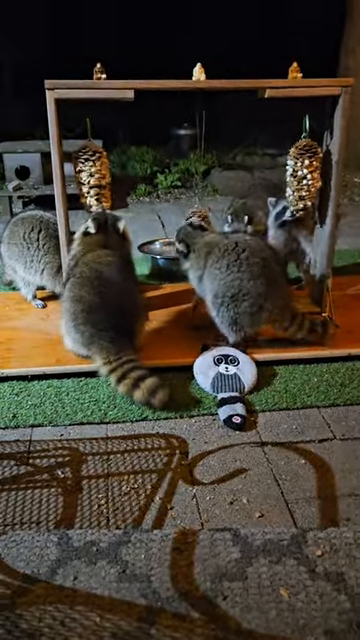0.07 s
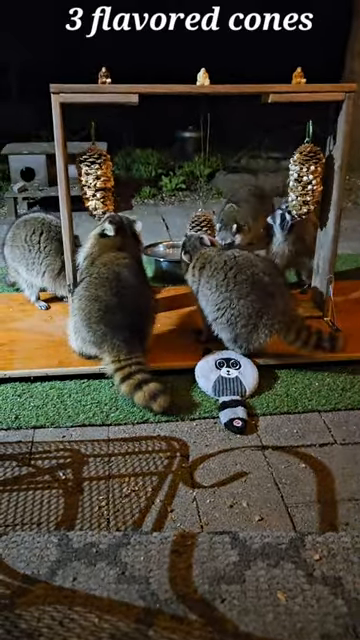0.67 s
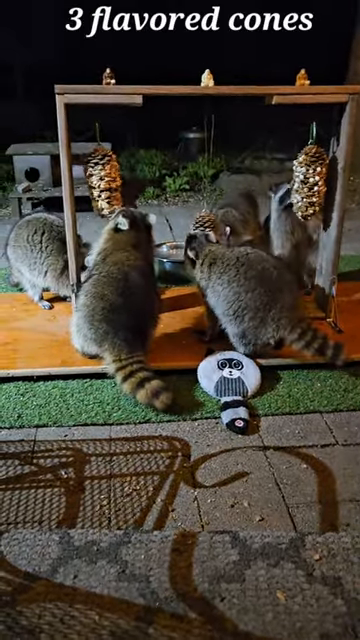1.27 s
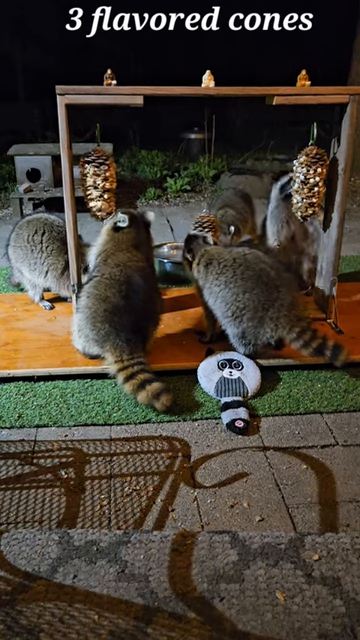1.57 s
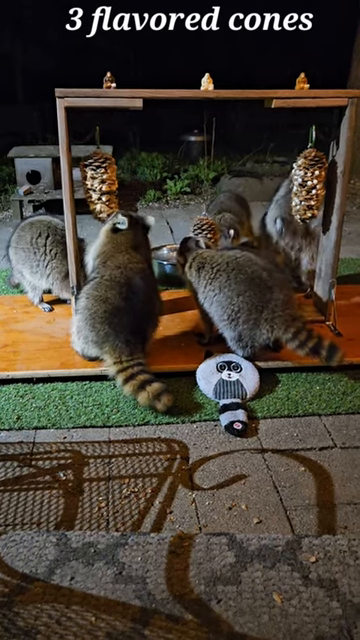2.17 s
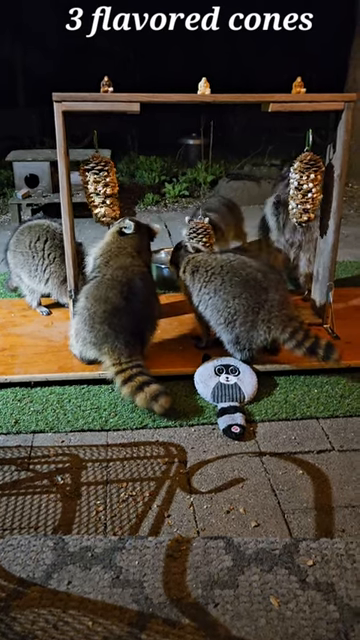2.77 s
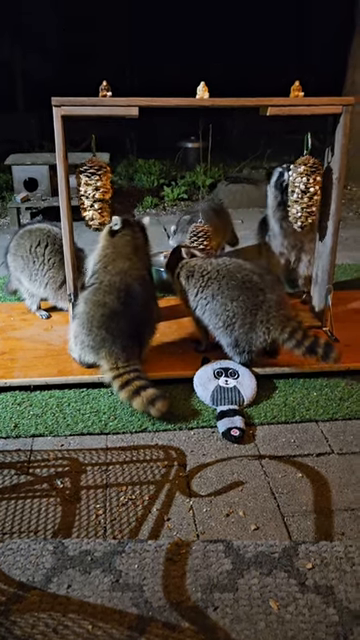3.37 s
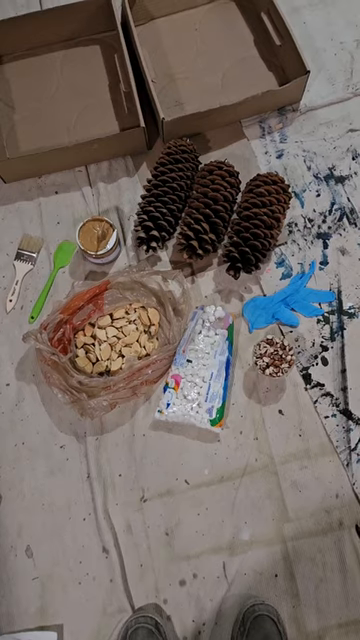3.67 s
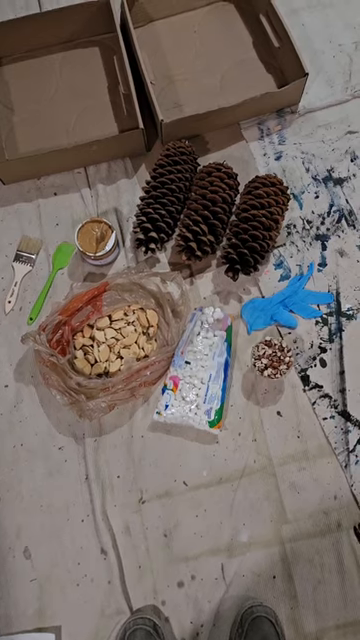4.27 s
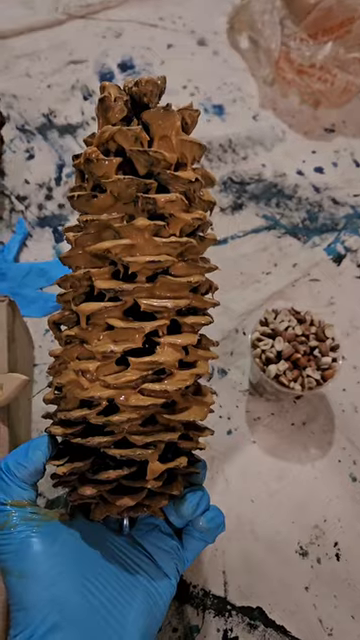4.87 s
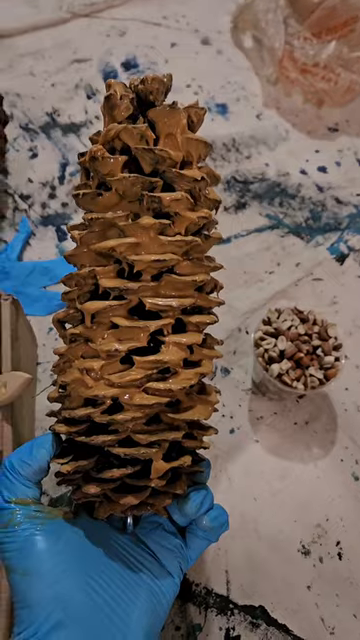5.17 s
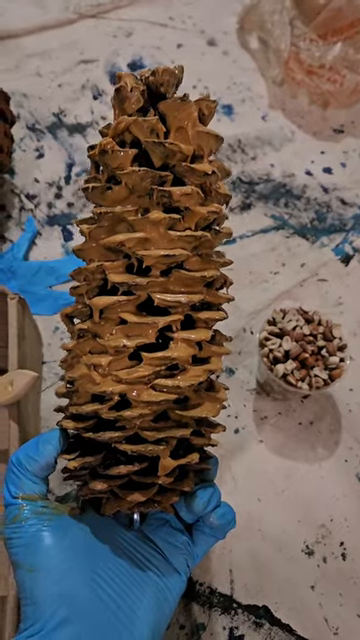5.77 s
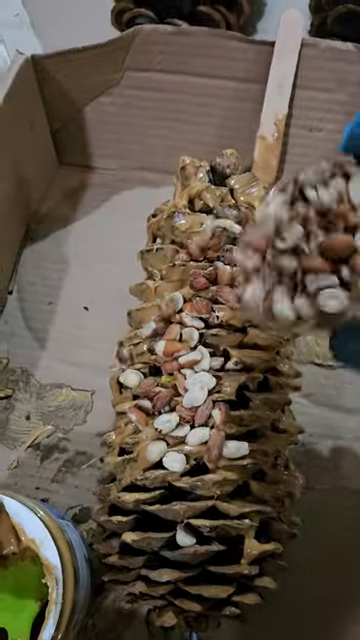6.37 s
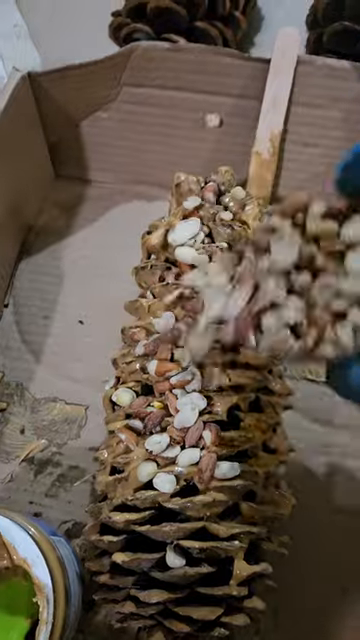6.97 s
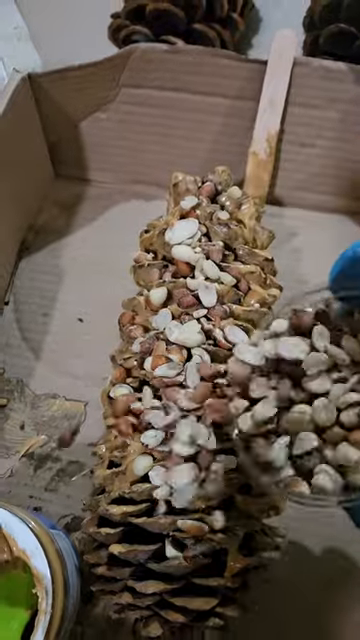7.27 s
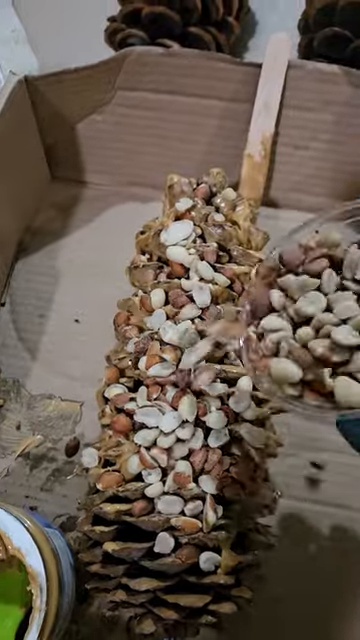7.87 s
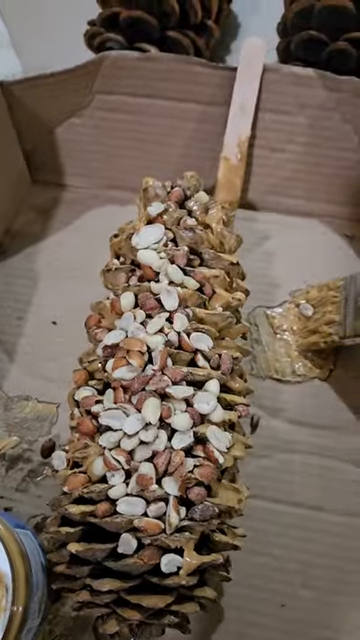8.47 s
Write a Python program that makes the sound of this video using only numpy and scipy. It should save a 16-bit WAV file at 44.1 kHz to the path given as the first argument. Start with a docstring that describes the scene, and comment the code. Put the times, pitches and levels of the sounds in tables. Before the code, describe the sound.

For the first 3.5 seconds, a quiet yard at night carries a low rumble and a distant machine hum, with a far engine swelling slightly near 1.7 seconds. Raccoons scratch and rustle faintly at feeders, with dry ticks and tiny chewing smacks. At about 3.5 seconds the sound cuts to a quiet room. Two soft, dull shuffles come at 3.6 and 3.9 seconds, followed by a few barely audible handling ticks over low room noise. From 5.8 seconds, peanuts rattle in a shaken cup close by and click irregularly onto a pine cone. Strays knock and bounce on the floor of a cardboard box, loudest around 6.8, 7.2 and 7.8 seconds, with a slightly hollow ring. Soft low handling bumps come near 6.5 and 7.6 seconds. The rattle fades out by about 8.3 seconds with one last small bump.

```python
"""A yard at night, then a quiet room. Outside, raccoons scratch, rustle and chew faintly at hanging
feeders over a distant hum. Indoors, someone shuffles twice, softly; then peanuts are shaken from a cup
onto a pine cone. They click on its scales and on each other, and strays knock and bounce on the floor
of a cardboard box. Each impact excites damped modes of nut, cardboard and table, while sliding and
rustling sum many tiny contacts into noise."""
import sys
import numpy as np
from scipy import signal
from scipy.fft import rfft, irfft, next_fast_len
from scipy.io import wavfile
from scipy.ndimage import map_coordinates

SR = 44100
rng = np.random.default_rng(int(sys.argv[2]) if len(sys.argv) > 2 else 0)


def to_wav(sig):
    """Store sig (one row per channel, or 1-D mono) as 16-bit WAV at the path in sys.argv[1].

    Samples outside -1..1 are clipped; the rate is SR.
    """
    pcm = np.clip(np.atleast_2d(sig), -1, 1) * 32767
    pcm = np.round(pcm).astype(np.int16)
    wavfile.write(sys.argv[1], SR, pcm.T)  # frames by channels


N = 375291

# Modes of the box floor, its knock, a nut on a scale, the table, the box air: pitch_hz, relative_db, t60_s
FLOOR_MODES = [(477, -9, 0.022), (599, -6, 0.026), (672, 4, 0.02), (965, 4.5, 0.016)]
KNOCK_MODES = [(1270, -3, 0.0097), (1470, 0, .012), (1580, -3, 0.013), (1800, -6.5, 0.01),
               (2060, -9.5, .008)]
NUT_MODES = [(2570, 2, 0.0065), (3327, -6, 0.011), (3640, -0.5, 0.0099), (4363, 4, 0.0059)]
TABLE_MODES = [(125.3, -10.5, 0.15), (181, 2.5, 0.031), (242.2, 5, 0.033), (343, -3.5, 0.0328)]
CAVITY_MODES = [(554, 5, 0.072), (583, 1.5, 0.092), (676, 0, 0.083)]
# Nuts landing on cardboard: start_s, knock_db, boom_over_knock_db, click_over_knock_db, knock_hz
LANDINGS = [(6.8457, -14.5, -4, -14, 1373), (6.927, -33, 5.5, -11, 1490), (6.9773, -41.5, 8, -14, 1410),
            (7.0238, -49.5, 10, -20, 1360), (7.092, -30.5, -6.5, -18, 1620), (7.0993, -39, 6, -20, 1420),
            (7.1163, -28.5, 1.5, -12.5, 1370), (7.1738, -17.5, -2.5, -12, 1467), (7.1938, -42, 7, -8, 1460),
            (7.211, -35, -3, -21, 1440), (7.7653, -15, -11, -6, 1653), (7.8734, -25.5, -4, -22.5, 1430),
            (7.9247, -34, -1, -30, 1320), (7.9642, -35.5, -2.5, -14.5, 1420),
            (7.983, -46.5, 0.5, -21, 1450), (8.0705, -52.5, 4.5, -25, 1400)]
# Sharp nut clicks: strikes on the cone, and the bright snap of the two loudest landings on cardboard:
# start_s, click_db, brightness_db (more snap, less knock)
SHARP_CLICKS = [(5.8243, -44, 0.5), (5.833, -40, 1.5), (5.8588, -44.5, -3.5), (5.9198, -37, 5),
                (5.9635, -48.5, 6), (6.0143, -57.5, 1), (6.0502, -49, -4.5), (6.0783, -46.5, 0),
                (6.1129, -40.5, -3.5), (6.1173, -41, 1.5), (6.1417, -41, -0.5), (6.1506, -45, -1.5),
                (6.2456, -46.5, 3.5), (6.3233, -54, -7.5), (6.4168, -43, 5), (6.425, -44, -2),
                (6.5454, -49.5, 6), (6.6262, -42, 0), (6.6415, -41, 3.5), (6.8458, -32, 4.5),
                (7.0445, -41.5, -0.5), (7.149, -41.5, -3), (7.29, -48.5, -2.5), (7.352, -63, -11.5),
                (7.3672, -37, -2.5), (7.4248, -59.5, 15.5), (7.479, -44, -0.5), (7.6023, -42, -2.5),
                (7.6152, -40.5, 7.5), (7.6603, -51, -2.5), (7.709, -40, 3), (7.7654, -37, 9.5),
                (7.8093, -35.5, 1), (7.9742, -41.5, 6)]
# How hard the nuts slide in the cup: time_s, level_db
SLIDE_LEVELS = [(5.81, -50.5), (5.87, -60), (6.15, -56), (6.48, -66), (6.7, -56.5), (7.04, -50),
                (7.33, -64), (7.43, -58.5), (7.88, -55), (8.14, -68), (8.3, -89)]
# Soft bumps of hand, cup and box: start_s, pitch_hz, level_db, t60_s
SOFT_BUMPS = [(6.541, 187, -42.5, 0.2), (6.545, 122, -45, 0.33), (6.53, 353, -59.5, 0.12),
              (7.64, 187, -46, 0.18), (7.645, 126.5, -43, 0.16), (8.30, 454, -56, 0.062)]
# Ticks of claws, teeth and handling: start_s, crunch_db, brightness_db (more splitting, less knock)
DRY_TICKS = [(0.166, -59, 2), (.33, -72.5, -14.5), (.448, -65, -3), (.768, -67.5, 15), (.947, -76, 20.5),
             (.965, -77, 18), (.992, -76.5, 22.5), (1.883, -83, 22), (2.81, -61, -4), (3.14, -80, -19),
             (3.436, -80, -18), (3.76, -56, 3), (4.634, -81.5, -3), (4.993, -87.5, -11), (5.327, -86, -9),
             (5.495, -77.5, 3)]
# Strokes of friction: start_s, hold_s, level_db
SHUFFLE_STROKES = [(3.63, 0.043, -53), (3.895, 0.0077, -58)]
HUSK_STROKES = [(.06, .05, -70), (.14, 0.0074, -64), (.23, 0.063, -65), (.42, 0.1, -66),
                (.89, 0.048, -69.5), (1.43, 0.011, -77), (1.87, .02, -87), (2.18, 0.049, -73.5),
                (2.44, .1, -75.5), (2.79, 0.0084, -72), (3.11, .03, -81), (3.41, .03, -83)]
PAW_STROKES = [(.15, .005, -55), (.315, .005, -61), (.43, 0.017, -59)]
# Raccoons chewing: peak_s, pitch_hz, level_db
SMACKS = [(1.52, 2780, -80), (1.654, 3600, -75), (1.704, 3840, -73), (1.804, 2950, -73), (1.975, 3530, -73),
          (2.124, 2670, -69), (2.72, 3090, -74.5)]
# Distant machine hum: pitch_hz, level_db
HUM_TONES = [(93, -54.5), (244, -66)]
# A far engine rising and falling: time_s, pitch_hz, level_db
ENGINE_COURSE = [(0, 133, -57), (1.298, 131.1, -57.5), (1.65, 133.1, -51), (2.0, 147.8, -57.5),
                 (2.449, 129, -57), (3.5, 127.8, -59.5)]

# Spectral shapes of the noise sources: frequency_hz, relative_density_db
SKIN_SPECTRUM = [(2500, -21.5), (5000, 7), (6300, 2.5), (7500, 0), (9000, -2), (9800, -11), (12500, -7),
                 (16000, -12)]  # peanut skins snapping
RATTLE_SPECTRUM = [(290, -54.5), (500, -24), (880, -2.5), (1210, -10), (1480, -5.5), (1820, -6),
                   (3150, -15.5), (4150, -15), (9090, -28), (9770, -31), (13100, -29), (16000, -31)]
THUD_SPECTRUM = [(18, -43), (30, -13), (80, -0.5), (183, -18.5), (350, -20), (460, -33), (770, -120)]
SCUFF_SPECTRUM = [(150, -32), (250, -5), (558, 0.5), (665, -4.5), (782, 0.5), (854, -8), (1150, -10),
                  (1390, -7), (2050, -22), (5000, -36), (7500, -37), (12000, -70)]
CRUNCH_SPECTRUM = [(1400, -5), (2400, -3.5), (4500, 6), (6000, -27.5)]  # husks giving way
SPLIT_SPECTRUM = [(4000, -9), (6000, 1), (9000, -2), (15000, -3.5)]  # dry husks splitting
HUSK_SPECTRUM = [(1000, -0.5), (2300, 2.5), (3200, -11.5), (4300, -4), (5600, -18.5), (8800, -9.5),
                 (9800, -21), (16000, -17.5)]
PAW_SPECTRUM = [(200, -6), (380, 13), (800, -4), (2200, 3.5), (3200, -12), (4300, -14), (6000, -41)]
NIGHT_SPECTRUM = [(25, -11.5), (48, -5), (62, 2.5), (78, -1.5), (112, -6.5), (150, -7.5), (245, -12),
                  (330, -19.5), (560, -23.5), (700, -15.5), (820, -25), (1000, -21), (2000, -33.5),
                  (2800, -55.5), (4500, -77)]
STILL_AIR_SPECTRUM = [(15, -29), (25, 10), (525, -10), (662, -9.5), (1670, -18.5), (2500, -24), (3250, -45),
                      (5500, -120)]
RUMBLE_SPECTRUM = [(15, -53), (25, -19), (48, -8), (71, -3), (139, -10.5), (331, -31.5), (900, -42.5),
                   (1700, -46), (2500, -61), (3250, -102.5), (5500, -120)]
HISS_SPECTRUM = [(880, -49.5), (1500, -14), (1740, -15), (1790, -7.5), (2370, -12), (3480, -8.5),
                 (3840, -8), (4730, -3), (6830, -22), (7460, -16.5), (16000, -29.5)]
# Likeness of left and right, outdoors and indoors: frequency_hz, correlation
NIGHT_COHERENCE = [(60, 0.98), (130, 1), (290, .77), (640, 0.5), (1410, -0.43), (6000, 0.94)]
INDOOR_COHERENCE = [(60, 0.93), (130, 1), (290, 0), (640, 0.089), (1410, 0)]
# Reverberation time of the room: frequency_hz, t60_s
ROOM_DECAY = [(200, 0.2), (600, 0.31), (1500, 0.23), (4000, 0.18), (9000, 0.18), (15000, 0.017)]
# Stereo balance of the rattle: frequency_hz, left_over_right_db
RATTLE_PAN = [(700, 5), (1400, -2.0), (4500, 4.5), (8000, 7.5)]

# Spans of time: start_s, end_s
YARD, SHUFFLING, BEFORE_POUR, POUR = (0, 3.525), (3.556, 4.70), (4.70, 5.765), (5.806, 8.6)
MID_BOX = (6.90, 7.25)  # nuts land near the middle of the box floor
KNOCK_HZ = 1468  # the knock pitch at which KNOCK_MODES are listed
TIME_S = np.arange(N) / SR


def peanuts():
    """Impact excitation: each contact rings the nut, the cardboard and the table under it."""
    boxes, out = np.zeros((2, 2, N))
    for s, boom_db, knock_db, click_db, snap_db, knock_hz in contacts():
        spot_modes = [(hz * knock_hz / KNOCK_HZ, db, t60) for hz, db, t60 in KNOCK_MODES]
        boom = amp(boom_db) * ring(FLOOR_MODES, attack_s=0.0008, spread_rad=0.73, pan_db=2)
        knock = amp(knock_db) * ring(spot_modes, attack_s=0.00087, spread_rad=0.64, pan_db=-6)
        box = thin_panel(boom + knock, cut_hz=384)
        touch = click(click_db, snap_db)
        table = amp(boom_db - 18) * ring(TABLE_MODES, attack_s=0.0027, spread_rad=0.31, pan_db=-2)
        add(boxes, s, box)
        add(out, s, touch + table)
        # an oval nut grazes just before it lands, then rocks onto its other end
        graze_s, rock_s = rng.uniform(0.71, 1, 2) * [0.003, 0.011]
        add(out, s - graze_s, amp(-10) * click(click_db, snap_db))
        add(out, s + rock_s, amp(-14.5) * click(click_db, snap_db))
        # the loudest blows land nearest the listener, so they are also the driest
        wet_db = -13 - 0.2 * (max(knock_db, click_db) + 44.5)
        add(out, s, amp(wet_db) * reverberation(box + amp(3) * touch, build_s=0.0041))
    return boxes + amp(6) * box_cavity(boxes) + out


def contacts(touches_per_s=20, spread_db=7):
    """Collisions: landings, sharp clicks, and chance touches that follow the sliding level."""
    landings = [(s, db + boom_db, db, db + click_db, db + click_db - 20.5, hz)
                for s, db, boom_db, click_db, hz in LANDINGS]
    slide_s, slide_db = np.transpose(SLIDE_LEVELS)
    slots_s = np.arange(slide_s[0], slide_s[-1], 1 / touches_per_s)
    lateness, size, hardness = rng.random((len(slots_s), 3)).T
    touch_s = slots_s + lateness / touches_per_s
    touch_db = np.interp(touch_s, slide_s, slide_db) + 1 + spread_db * (2 * size - 1)
    touches = zip(touch_s, touch_db, spread_db * (2 * hardness - 1))
    return landings + [sharp_contact(*row) for row in [*SHARP_CLICKS, *touches]]


def sharp_contact(s, click_db, brightness_db):
    """Contact stiffness: the harder the contact, the more snap and the less box knock."""
    knock_db = click_db + 2 - brightness_db
    boom_db = knock_db - 14.5
    snap_db = click_db - 7.5 + brightness_db
    knock_hz = KNOCK_HZ * np.exp(0.09 * rng.standard_normal())  # varies from spot to spot
    return s, boom_db, knock_db, click_db, snap_db, knock_hz


def click(click_db, snap_db):
    """A brief contact excites the high modes of a nut while its dry skin snaps."""
    body = amp(click_db) * ring(NUT_MODES, attack_s=0.00037, spread_rad=0.93, pan_db=0)
    return body + amp(snap_db) * burst(SKIN_SPECTRUM, swell_s=0.0012, pan_db=7)


def thin_panel(x, cut_hz):
    """Radiation efficiency: a light panel radiates little below its lowest modes."""
    return signal.sosfilt(signal.butter(4, cut_hz, "high", fs=SR, output="sos"), x)


def box_cavity(x):
    """Cavity resonance: the air in the box rings on after blows near the middle of its floor."""
    t = np.arange(SR // 3) / SR
    response = sum(amp(db - 60 * t / t60) * np.sin(2 * np.pi * hz * t) for hz, db, t60 in CAVITY_MODES)
    response /= np.abs(rfft(response)).max()
    return signal.fftconvolve(x * gate(MID_BOX), response[None], axes=1)[:, :N]


def cup_rattle():
    """Granular flow: nuts tumbling in the shaken cup merge their collisions into a rattle."""
    slide_s, slide_db = np.transpose(SLIDE_LEVELS)
    slide = amp(np.interp(TIME_S, slide_s, slide_db, left=-140, right=-140))
    rattle = slide * grains(RATTLE_SPECTRUM, per_s=170, spread_db=3.5, swell_s=0.0008, wash=0.45)
    return filtered(rattle, lambda hz: amp(along(RATTLE_PAN, hz) * [[0.5], [-0.5]]))


def bumps():
    """A slow force excites only a low mode: soft pushes of hand, cup and box each sound one note."""
    out, t = np.zeros((2, N)), np.arange(SR // 3) / SR
    for s, hz, db, t60 in SOFT_BUMPS:
        envelope = amp(db - 60 * t / t60) * (1 - np.exp(-t / 0.0072))
        add(out, s, envelope * np.sin(2 * np.pi * hz * t))
    return out


def shuffles():
    """Sliding friction: a dull scuff over a low thud rings in the room and squeaks a little."""
    thud = amp(8.5) * strokes(SHUFFLE_STROKES, attack_s=0.02, t60_s=0.63)
    scuff = strokes(SHUFFLE_STROKES, attack_s=0.056, t60_s=0.48)
    squeak = amp(-70.5) * (scuff / amp(-52)) ** 2.1  # grows 2.1 dB per dB of scuff
    ringing = narrow_band(554, 40) + narrow_band(786, 27) + amp(-1.5) * narrow_band(1420, 60)
    rubbing = amp(2) * air(SCUFF_SPECTRUM, INDOOR_COHERENCE) + amp(-11) * ringing
    return thud * air(THUD_SPECTRUM, INDOOR_COHERENCE) + scuff * rubbing + squeak * narrow_band(4060, 70)


def ticks():
    """Brittle fracture: claws and teeth knock, crunch and split husks; handling ticks alike indoors."""
    out = np.zeros((2, N))
    for s, db, brightness_db in DRY_TICKS:
        tick = amp(db - 1 - brightness_db) * ring(KNOCK_MODES, attack_s=0.00079, spread_rad=1, pan_db=-14)
        tick += amp(db) * burst(CRUNCH_SPECTRUM, swell_s=0.0016, pan_db=-12.5)
        tick += amp(db - 9 + brightness_db) * burst(SPLIT_SPECTRUM, swell_s=0.0015, pan_db=5.5)
        add(out, s, tick)
        add(out, s, amp(-6) * reverberation(tick, build_s=0.0012))
    return out


def rummaging():
    """Friction noise: raccoons stir the husks and scrape the feeder with their paws."""
    rustle = strokes(HUSK_STROKES, attack_s=0.013, t60_s=0.36)
    scrape = strokes(PAW_STROKES, attack_s=0.017, t60_s=0.23)
    husks = grains(HUSK_SPECTRUM, per_s=700, spread_db=5, swell_s=0.001, wash=1)
    paws = grains(PAW_SPECTRUM, per_s=480, spread_db=3, swell_s=0.0014, wash=1)
    return rustle * husks + scrape * paws


def chewing(swell_s=0.006, edge_ratio=1.67):
    """Resonance of the mouth confines each soft smack to a narrow band."""
    out = np.zeros((2, N))
    for s, hz, db in SMACKS:
        mouth = [(hz / edge_ratio, -30), (hz, 0), (hz * edge_ratio, -30)]
        add(out, s - swell_s, amp(db) * burst(mouth, swell_s, pan_db=-3))
    return out


def distant_machines():
    """Periodic motion radiates tones: a steady hum, and a far engine that rises and falls."""
    s, engine_hz, engine_db = np.transpose(ENGINE_COURSE)
    hum = sum(drifting_tone(hz, db) for hz, db in HUM_TONES)
    return hum + drifting_tone(np.interp(TIME_S, s, engine_hz), np.interp(TIME_S, s, engine_db))


def night_air():
    """Ambient noise outdoors, with most of its power at low frequencies."""
    return amp(-48.5) * air(NIGHT_SPECTRUM, NIGHT_COHERENCE)


def noise_floor():
    """Broadband noise: low room rumble and microphone hiss, stepping in level from span to span."""
    still = amp(-72.5) * gate(SHUFFLING) * air(STILL_AIR_SPECTRUM, INDOOR_COHERENCE)
    rumble_gain = amp(-58.5) * gate(BEFORE_POUR) + amp(-56.5) * gate(POUR)
    rumble = rumble_gain * air(RUMBLE_SPECTRUM, INDOOR_COHERENCE)
    hiss_gain = amp(-85.5) * gate(YARD) + amp(-81.5) * gate(POUR)
    hiss_gain += amp(-84) * (gate(SHUFFLING) + gate(BEFORE_POUR))
    return still + rumble + hiss_gain * air(HISS_SPECTRUM, INDOOR_COHERENCE)


def reverberation(sound, build_s):
    """Diffuse reflections form a random tail of unit energy whose treble dies first."""
    hz, t, bands = signal.stft(rng.standard_normal((2, SR // 4)), SR, nperseg=256)
    tail = signal.istft(bands * amp(-60 * t / along(ROOM_DECAY, hz)[:, None]), SR, nperseg=256)[1]
    tail *= np.clip(np.arange(tail.shape[1]) / SR / build_s, 0, 1) ** 2
    return signal.fftconvolve(sound, tail / np.linalg.norm(tail[0]), axes=1)


def ring(modes, attack_s, spread_rad, pan_db):
    """Modal superposition: damped sines, varied at each blow, with the energy of 5 ms at rms 1."""
    t = np.arange(SR // 20) / SR
    hz, db, t60 = np.transpose(modes)[:, :, None]
    size, detune, skew = rng.standard_normal((3, len(modes), 1))
    sides = np.array([1, -1])[:, None, None]
    cycles = hz * (1 + 0.042 * detune) * t + rng.random((len(modes), 1))
    phase = 2 * np.pi * cycles + sides * spread_rad * skew  # each side hears a mode at its own phase
    partials = amp(db + 2.3 * size - 60 * t / t60) * np.sin(phase)
    wave = partials.sum(axis=1) * (1 - np.exp(-(t / attack_s) ** 2))
    return np.array([unit(side) for side in wave]) * amp(sides[:, 0] * pan_db / 2) / np.sqrt(10)


def burst(spectrum, swell_s, pan_db):
    """Tiny fractures add incoherently into a toneless burst with the energy of 5 ms at rms 1."""
    age = np.arange(SR // 20) / SR / swell_s
    noise = age * np.exp(-age) * rng.standard_normal((2, len(age))) * amp([[pan_db / 2], [-pan_db / 2]])
    return unit(filtered(noise, lambda hz: amp(along(spectrum, hz)))) / np.sqrt(10)


def grains(spectrum, per_s, spread_db, swell_s, wash):
    """Shot noise: random bursts of uneven size on an even wash, in stereo at rms 1."""
    onsets = rng.random(N) < per_s / SR
    sizes = amp(spread_db * np.minimum(rng.exponential(size=N), 3))
    age = np.arange(SR // 30) / SR / swell_s
    bursts = unit(signal.fftconvolve(onsets * sizes, age * np.exp(-age))[:N])
    crackle = (bursts + wash) * rng.standard_normal((2, N))
    return unit(filtered(crackle, lambda hz: amp(along(spectrum, hz))))


def air(spectrum, coherence):
    """Partly coherent stereo noise of rms 1: the mid-to-side ratio sets the correlation."""
    def response(hz):
        angle = np.arccos(np.clip(along(coherence, hz), -1, 1)) / 2
        return amp(along(spectrum, hz)) * [np.cos(angle), np.sin(angle)]
    mid, side = filtered(rng.standard_normal((2, N)), response)
    return unit(np.array([mid + side, mid - side]))


def narrow_band(hz, width_hz):
    """Random phase modulation spreads a tone into a narrow stereo band of rms 1."""
    drift_rad = 0.99 * np.array([wobble(width_hz), wobble(width_hz)])
    return unit(np.sin(2 * np.pi * hz * TIME_S + drift_rad))


def drifting_tone(hz, db):
    """Slow modulation of level and phase makes a hum waver."""
    phase = 2 * np.pi * np.cumsum(np.broadcast_to(hz, N)) / SR
    return amp(db + 2 * wobble(2.5)) * np.sqrt(2) * np.sin(phase + 0.5 * wobble(4))


def strokes(rows, attack_s, t60_s):
    """An envelope in which each stroke swells, holds and decays exponentially."""
    envelope = np.zeros(N)
    for s, hold_s, db in rows:
        swell = np.clip((TIME_S - s) / attack_s, 0, 1) ** 2
        decay_db = 60 * np.clip((TIME_S - s - attack_s - hold_s) / t60_s, 0, 2)
        envelope += swell * amp(db - decay_db)
    return envelope


def gate(span):
    """Unit gain during a span, with 2 ms fades."""
    return np.clip(np.minimum(TIME_S - span[0], span[1] - TIME_S) / 0.002, 0, 1)


def wobble(knots_per_s):
    """A smooth curve through random knots."""
    knots = rng.standard_normal(int(N * knots_per_s / SR) + 4)
    return map_coordinates(knots, [TIME_S * knots_per_s])


def filtered(x, response):
    """Linear filtering: the spectrum of x times a frequency response."""
    n = x.shape[-1]
    padded = next_fast_len(n + 2048)
    return irfft(rfft(x, padded) * response(np.fft.rfftfreq(padded, 1 / SR)), padded)[..., :n]


def along(points, hz):
    """Interpolate (frequency_hz, value) points on a log frequency axis."""
    point_hz, values = np.transpose(points)
    return np.interp(np.log(hz + 1), np.log(point_hz + 1), values)


def add(track, start_s, sound):
    """Superpose a sound on a track."""
    part = track[:, max(round(start_s * SR), 0):][:, :sound.shape[-1]]
    part += sound[..., :part.shape[1]]


def amp(db):
    """Decibels to amplitude ratio."""
    return 10 ** (np.asarray(db) / 20)


def unit(x):
    """Scale to rms 1."""
    return x / np.sqrt(np.mean(x ** 2) + 1e-20)


def scene():
    """Superposition: the pressures of all sources add, left and right."""
    yard = gate(YARD) * (distant_machines() + rummaging() + night_air())
    return yard + chewing() + ticks() + shuffles() + noise_floor() + peanuts() + cup_rattle() + bumps()


def record(dry):
    """Band limiting: nothing above 16.1 kHz passes."""
    return filtered(dry, lambda hz: hz < 16100)


dry = scene()
out = record(dry)
to_wav(out)
```